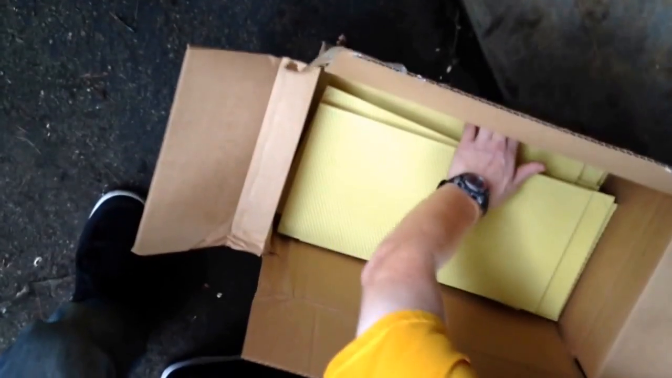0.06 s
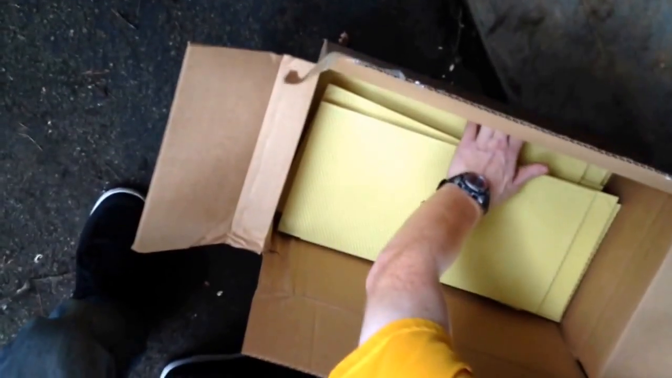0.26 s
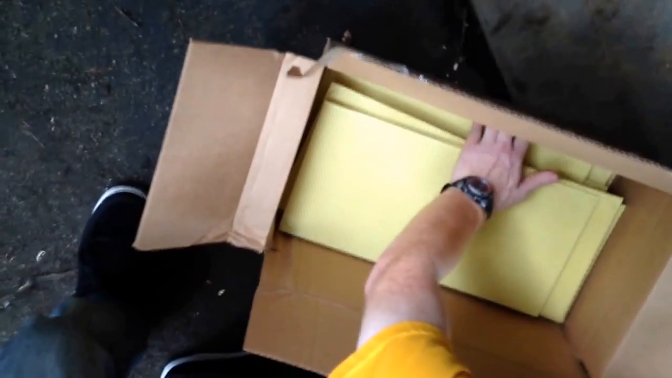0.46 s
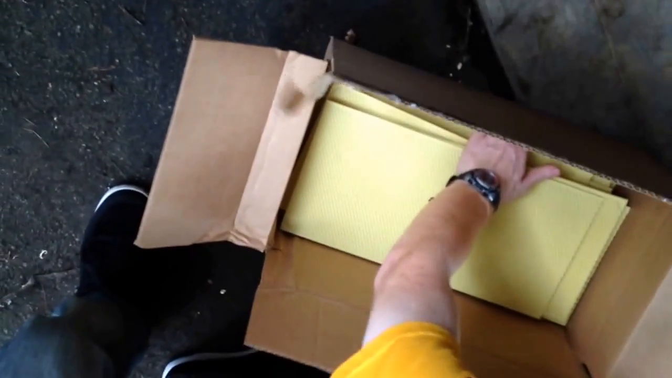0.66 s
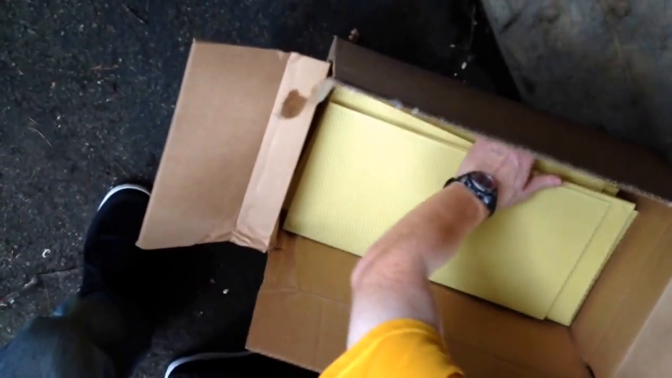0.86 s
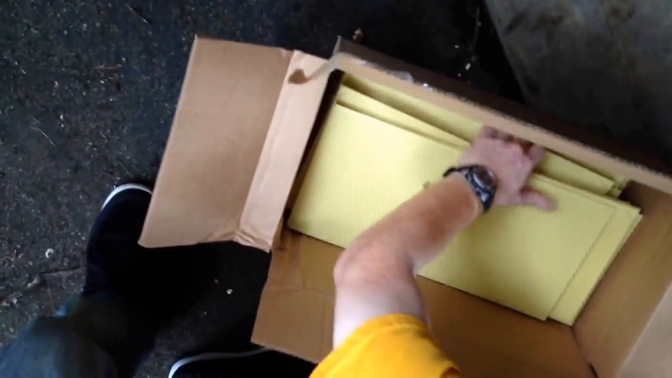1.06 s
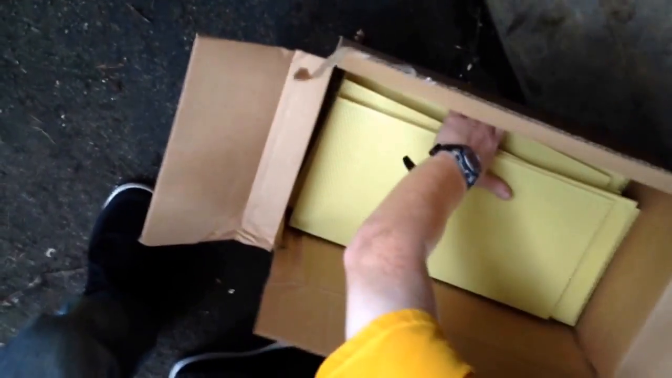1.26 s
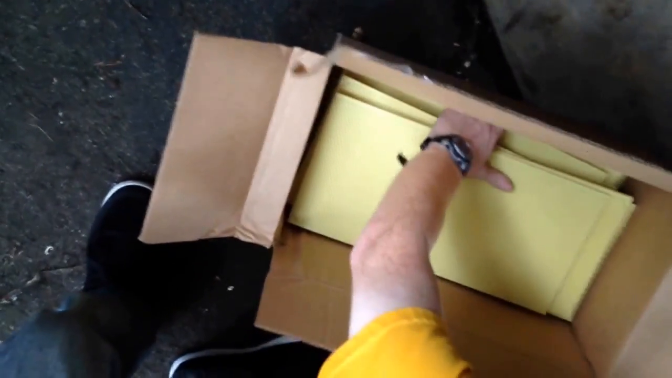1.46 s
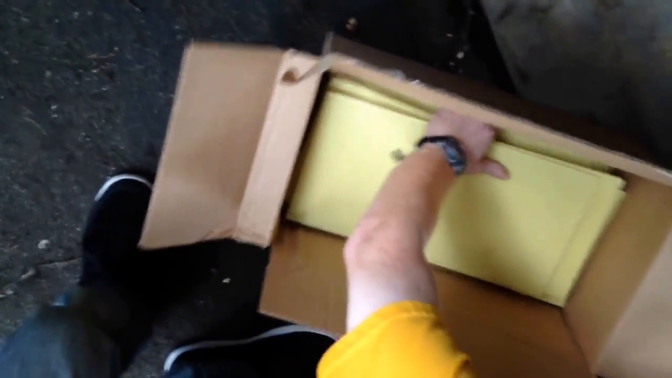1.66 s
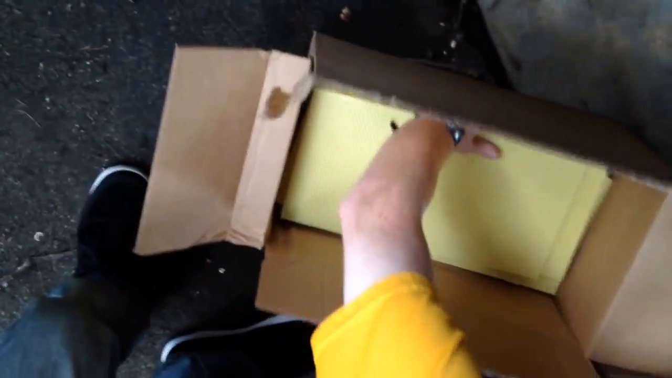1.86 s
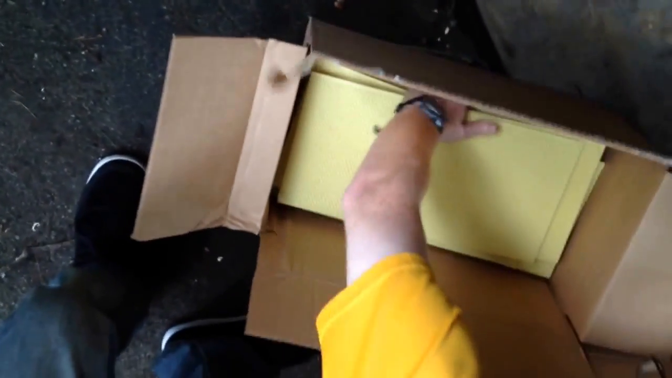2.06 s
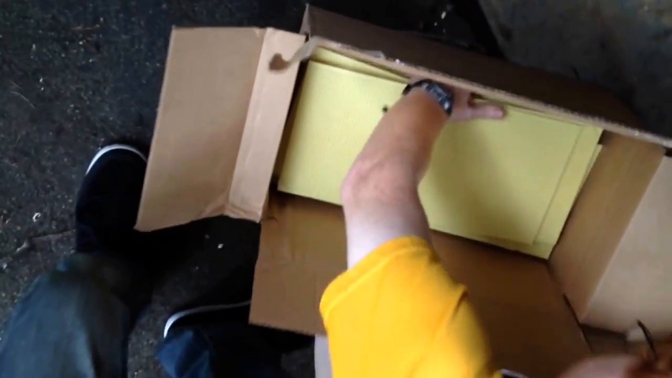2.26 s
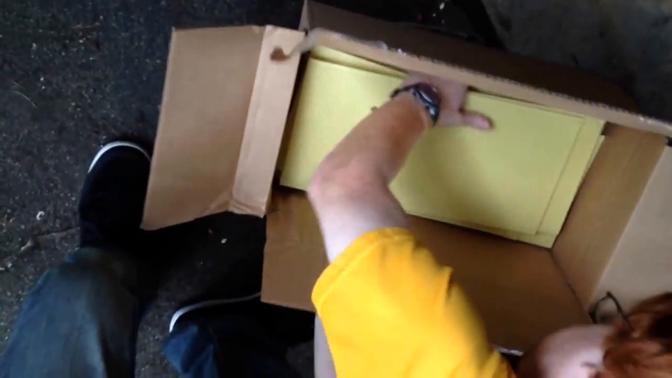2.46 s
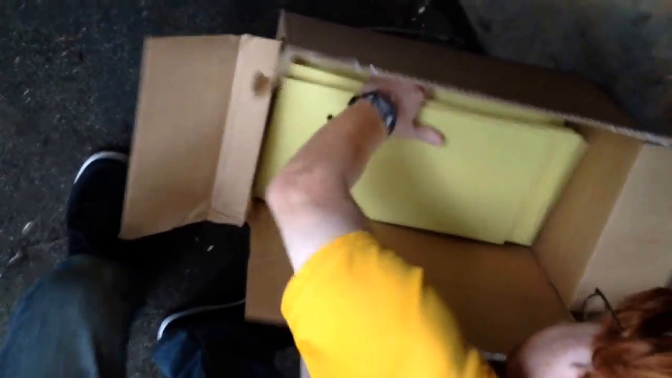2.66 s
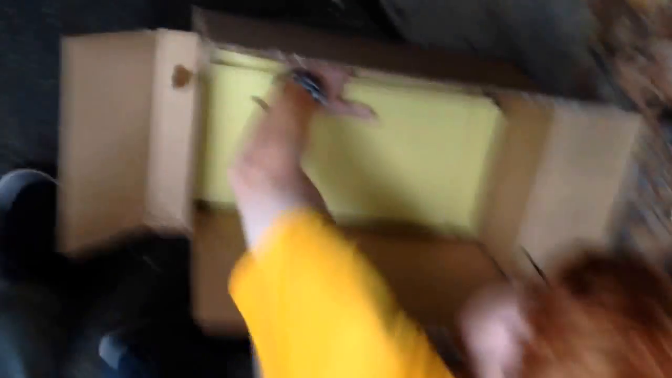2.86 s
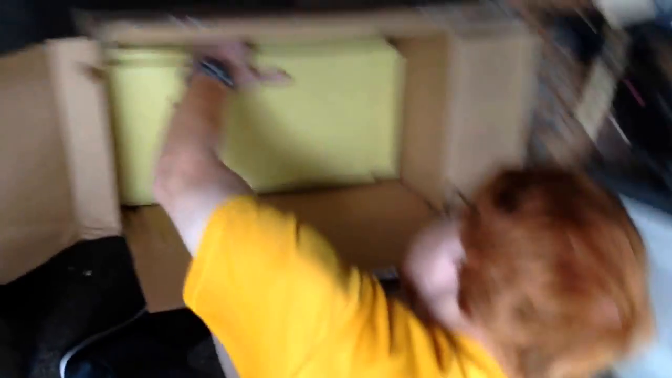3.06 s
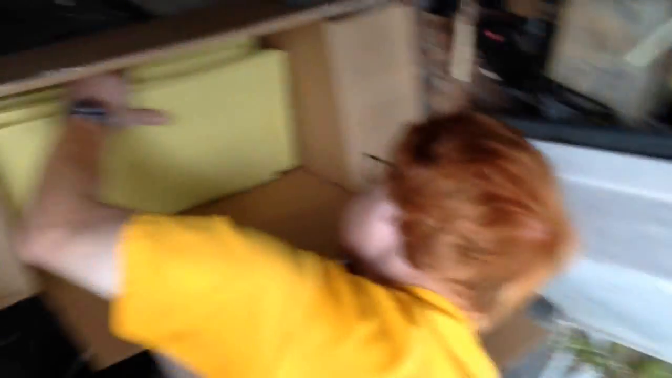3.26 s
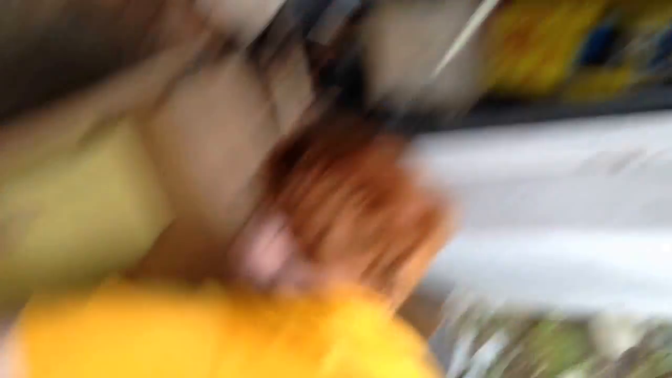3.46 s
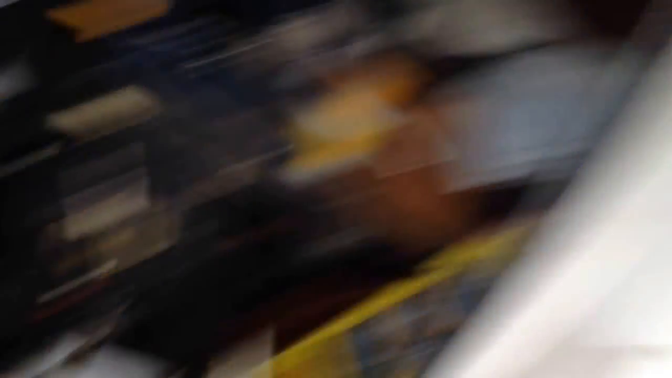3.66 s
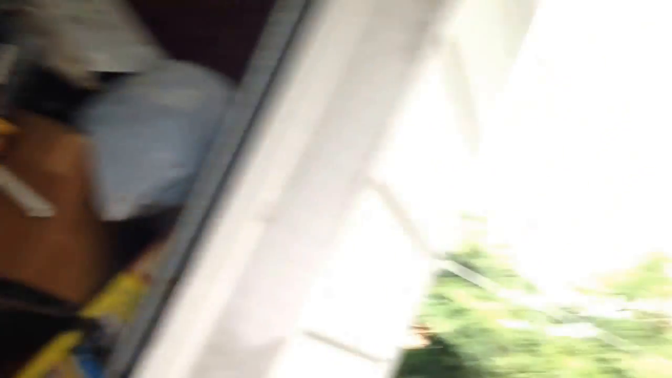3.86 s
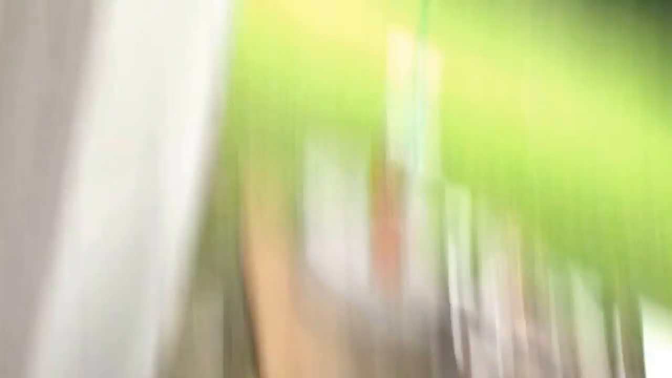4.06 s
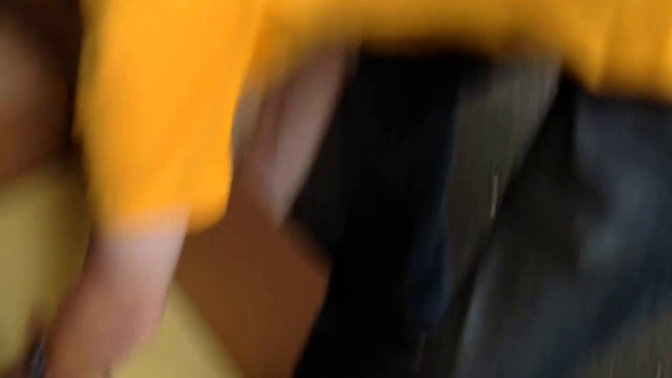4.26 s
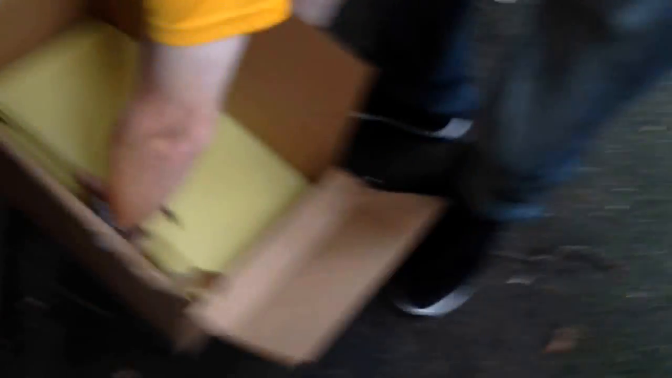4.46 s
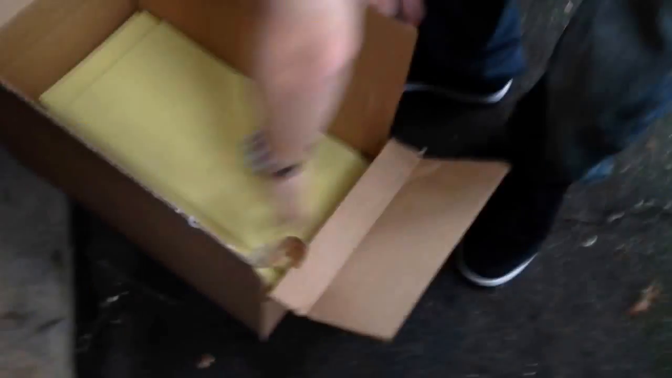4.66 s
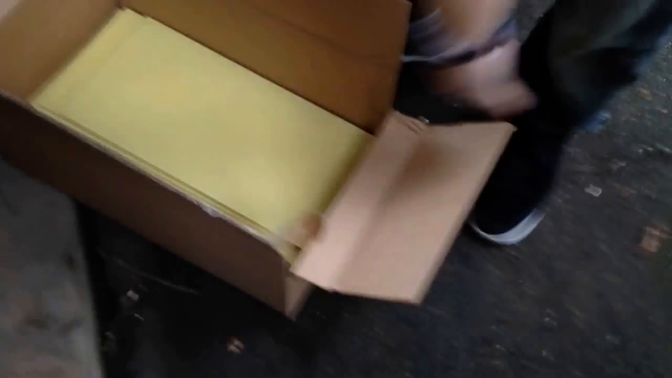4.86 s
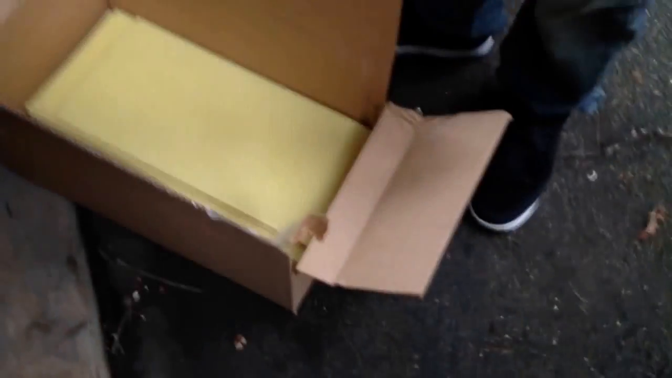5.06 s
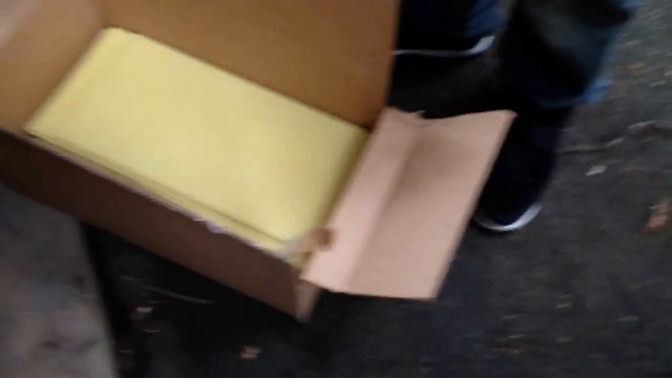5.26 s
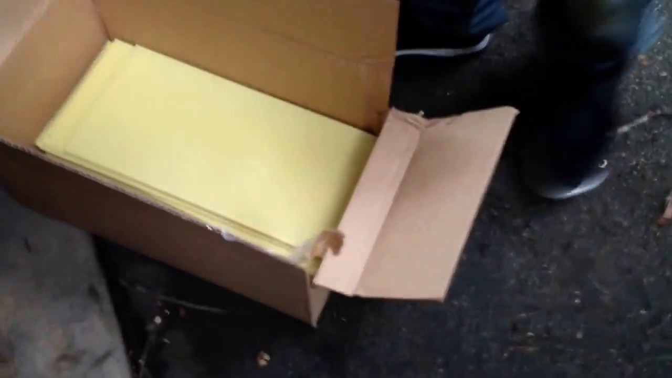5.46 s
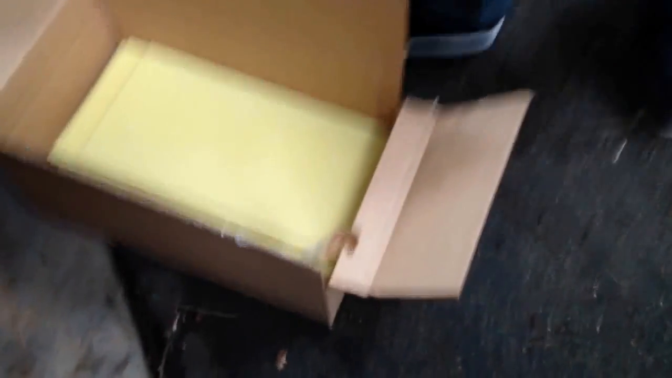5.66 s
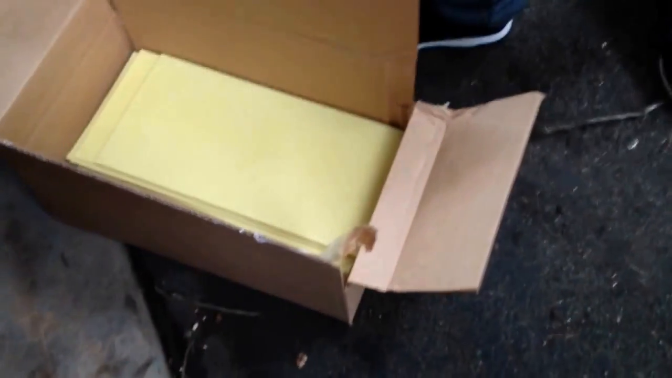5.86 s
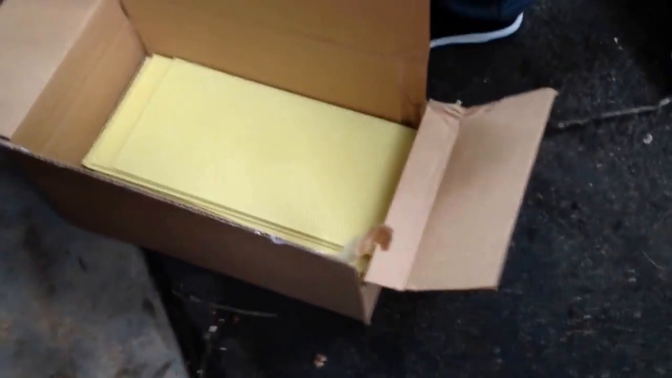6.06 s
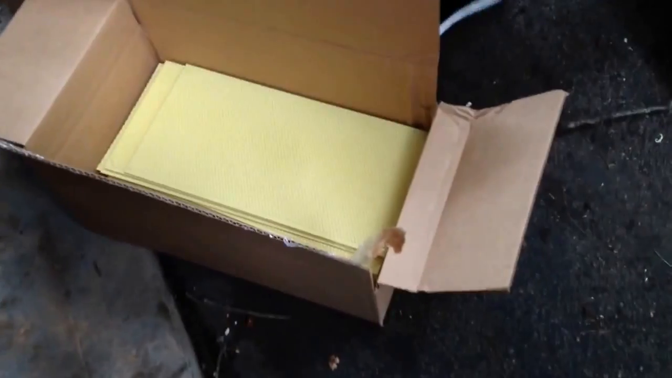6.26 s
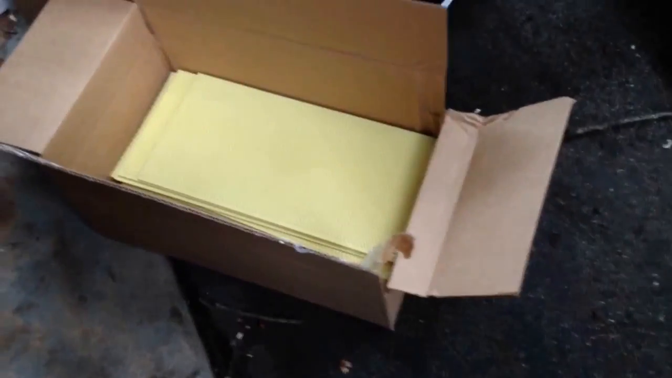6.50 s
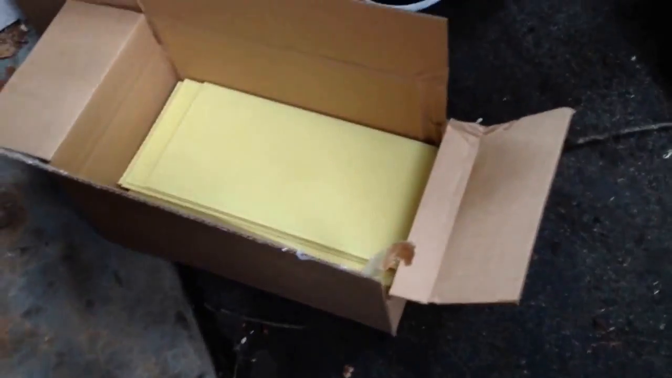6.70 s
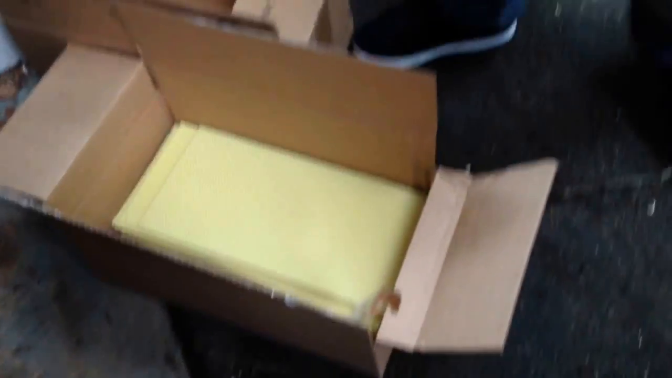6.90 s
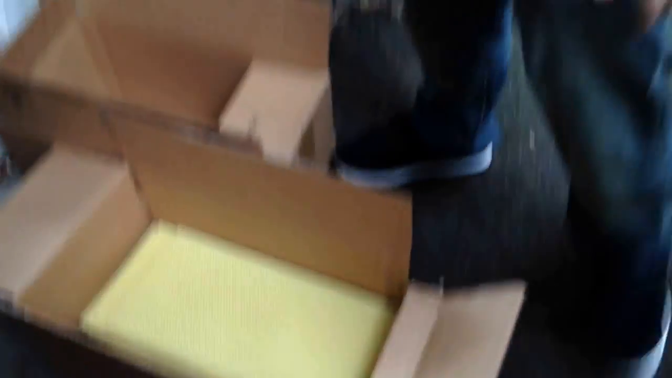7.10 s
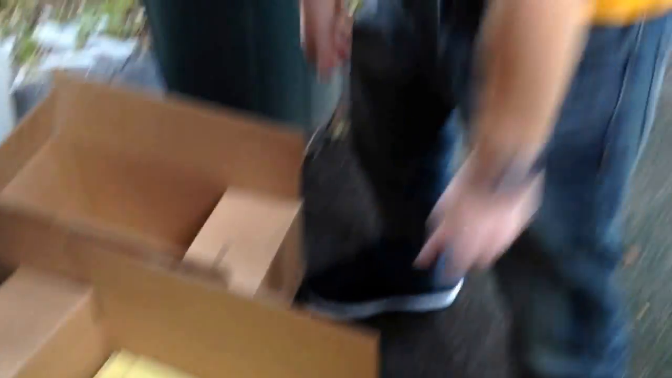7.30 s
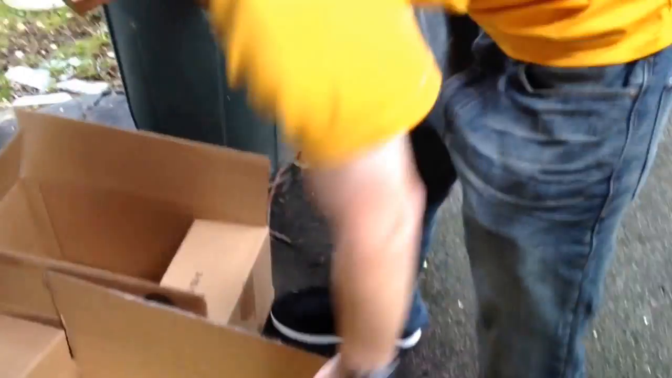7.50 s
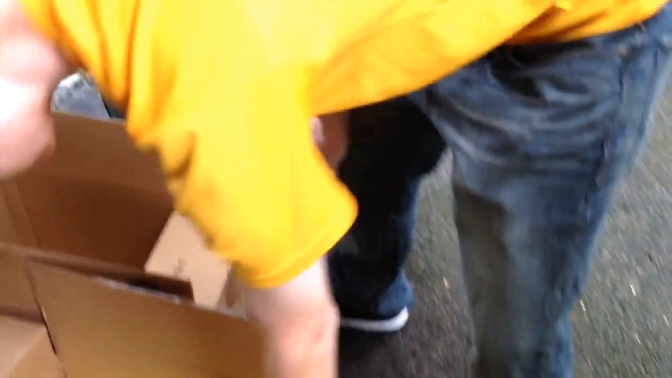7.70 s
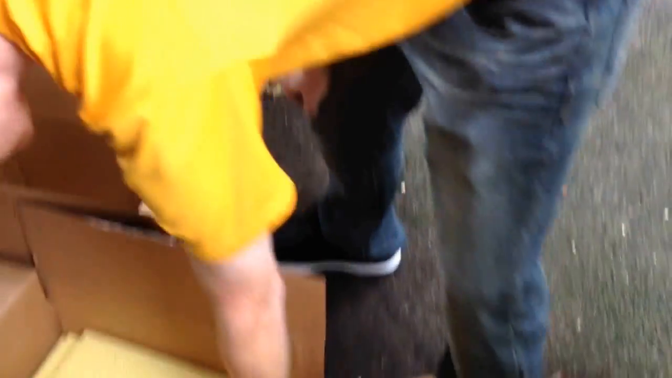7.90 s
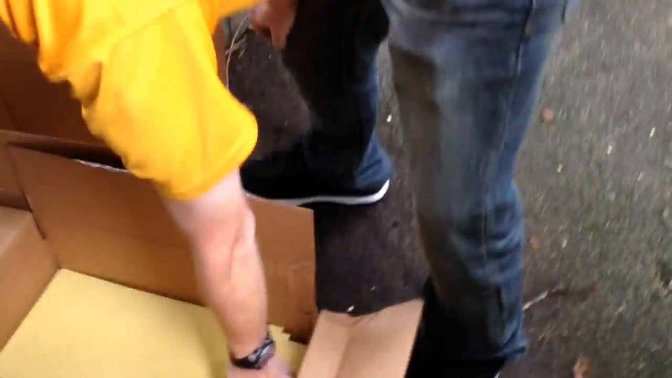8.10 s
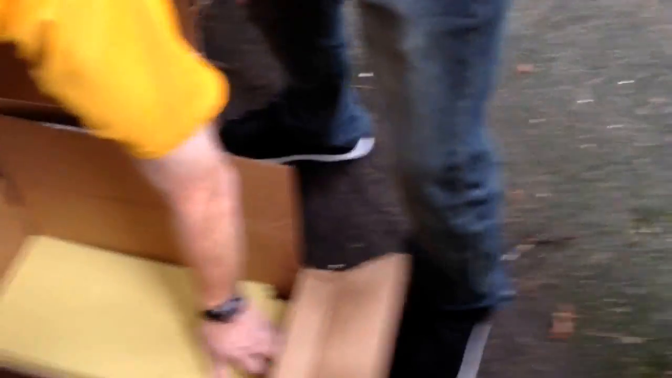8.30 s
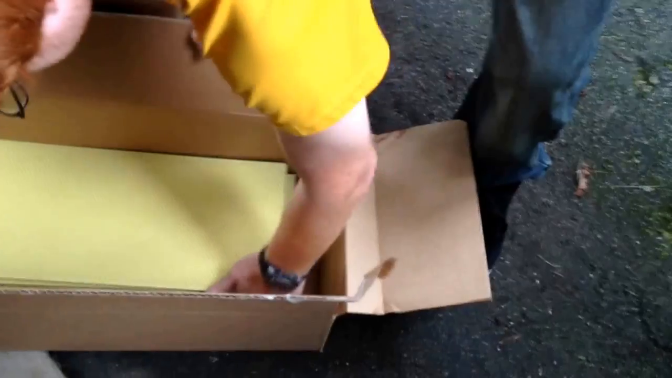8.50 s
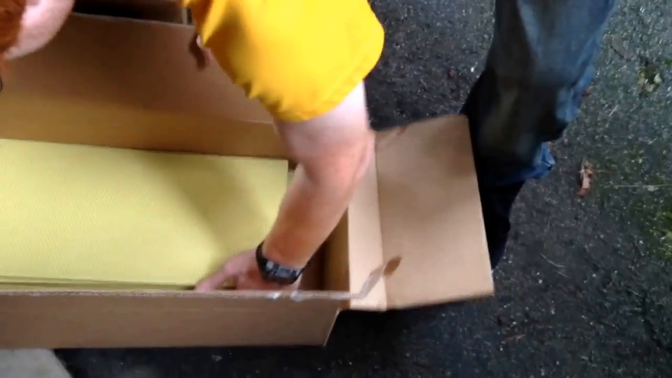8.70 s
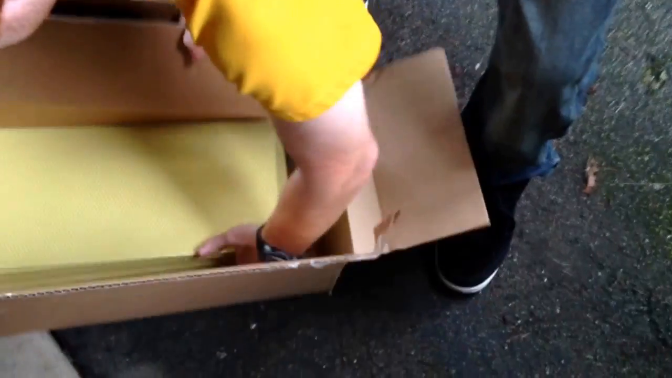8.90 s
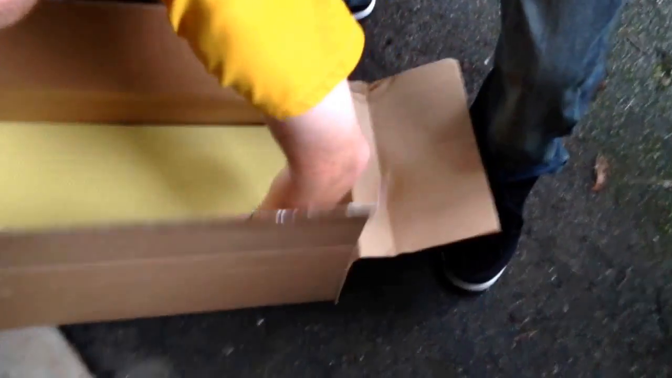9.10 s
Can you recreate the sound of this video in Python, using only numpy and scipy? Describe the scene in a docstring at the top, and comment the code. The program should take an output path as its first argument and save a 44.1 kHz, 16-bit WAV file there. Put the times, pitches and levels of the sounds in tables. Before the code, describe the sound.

A person's hands rub and push a cardboard box holding stiff plastic sheets. Faint rustles grow into scrapes, hollow thuds, knocks and cracking snaps, loudest around three to four seconds, with one short flap creak. A near-silent pause leaves low hum, far traffic, insects and faint birds before bumping and sliding resume. The microphone is close and the sound mostly dry, beside an open shed door.

```python
"""Box and plastic sheets

Hands shove a cardboard box and slide stiff plastic sheets inside it, by an open door.
Strokes are grainy friction noise; thuds, knocks, snaps and clicks are short dying sounds; a flap creaks once.
Behind them are a mains hum, far traffic and insects in one soft rush, and a few faint bird notes."""
import sys
import numpy as np
from scipy import signal
from scipy.fft import rfft, irfft, next_fast_len
from scipy.io import wavfile
from scipy.ndimage import uniform_filter1d, map_coordinates

SR = 44100
rng = np.random.default_rng(int(sys.argv[2]) if len(sys.argv) > 2 else 0)


def dump(signal):
    """Clip the signal to [-1, 1] and save it as 16-bit WAV at the path in sys.argv[1]."""
    limited = np.clip(np.atleast_2d(signal).T, -1, 1)
    pcm = np.round(limited * 32767).astype(np.int16)
    wavfile.write(sys.argv[1], SR, pcm)


N = 403074  # length in samples

# All levels in dB are settings that the functions below may trim.
# Strokes of hands, card and sheets. Each row: start of full strength in seconds, seconds to rise 20 dB,
# seconds held, seconds to fall 20 dB, rasp of card in dB, then scratch of nails, hiss of sheets
# and boom of the walls, each in dB over the rasp.
# Negative times cut off part of a stroke, or all of it.
STROKES = [(0.025, .02, .01, 0.07, -56, -14.5, -13, 15.5), (0.312, 0.17, 0.017, 0.1, -60.5, -6, -1, 6),
           (0.447, 0.23, .01, 0.14, -57.5, -11.5, -16, 7.5), (0.706, 0.06, 0.048, 0.14, -66, 3, 12.5, 8),
           (0.803, 0.0045, .045, 0.03, -30, -6.5, -11, -5), (0.927, .005, 0.009, 0.02, -42.5, -6, -3, -4),
           (1.014, .004, .008, .03, -39, -6, -10, -2), (1.072, .005, .016, .035, -39, -5.5, -7, -6),
           (1.148, -0.01, 0.028, 0.12, -52, -4, -1.5, 11.5), (1.201, -0.01, 0.019, 0.1, -45, -1.5, -0.5, 8),
           (1.633, 0.03, 0.019, 0.05, -31.5, -8.5, -11, 6), (1.675, .05, 0.055, 0.18, -45.5, -1, 4.5, -5),
           (1.913, .02, .03, .12, -42, -3, -3, 5), (2.03, .01, .03, .06, -47, -6, -6, 6),
           (2.21, .04, .06, .04, -42, -16, -12, 4), (2.38, .004, .016, .025, -36, -10, -16, 6.5),
           (2.469, 0.0039, 0.022, 0.08, -33, -4, -7, -1), (2.527, 0.0451, 0.057, .1, -35, -8, -10, 6),
           (2.64, 0.02, .04, .04, -37, -5, -8, 4), (2.682, .01, .018, .04, -30, -2.5, -7.5, -2),
           (2.879, .005, 0.016, .07, -43, 0.5, -1.5, 10.5), (3.048, -0.02, .05, 0.1, -38.5, -11.5, -14, 5),
           (3.209, .012, .014, .022, -25, -1, -11, -3), (3.27, 0.08, 0.07, 0.01, -41, -3, -0.5, 5),
           (3.32, 0.0157, .022, .045, -29, 1, -4, 2), (3.395, 0.1, .03, 0.09, -42, -4, -2.5, 10.5),
           (3.502, 0.025, 0.029, .035, -31, 1, -3, -4.5), (3.878, 0.04, 0.11, 0.07, -38, -3.5, -4, 2.5),
           (3.995, 0, 0.032, 0.0389, -22.5, -3, -4.5, -0.5), (4.333, 0.1, 0.043, .2, -49, -5, 1.5, 3.5),
           (4.411, -0.07, .02, 0.15, -43, -4, -1, 1), (4.455, .02, .06, .06, -41, -6.5, -1, 10),
           (4.56, .03, .055, .04, -48, -2, 1, 3), (4.683, 0, 0.036, 0.0454, -44.5, -12.5, 0.5, 8.5),
           (4.802, -0.14, 0.017, 0.0735, -51, -11, -11, -2), (5.65, .03, 0.044, .06, -59, -6, -7, 7.5),
           (5.78, .03, .03, .08, -62, 0, -2, 0), (6.0, .03, .045, .04, -57, -9, -11, -8),
           (6.663, .012, 0.054, 0.0651, -43.5, -4.5, 3.5, 5.5), (7.295, 0.5, .01, -0.24, -55, -6, -6, 2),
           (7.381, 0.04, 0.078, 0.076, -42.5, -3.5, 3.5, 4), (7.682, -0.01, .01, 0.05, -47, -17, -14, 18),
           (7.695, 0, 0.11, .1, -55, -4, 3, 5), (7.986, .025, 0.066, 0.0655, -34, -9, -5.5, -1.5),
           (8.084, 0.0155, 0.013, 0.08, -38.5, -9.5, -12.5, 6),
           (8.175, .06, 0, .035, -34.5, -12.5, -14.5, 4), (8.598, 0.03, 0.019, 0, -48.5, -12.5, -9.5, 4.5),
           (8.71, -0.05, .03, 0.1, -45, -4, 2, 2), (8.787, 0.1174, .11, .2, -40, -1.5, 7.5, 6.5),
           (8.978, 0.12, 0.057, 0.05, -46, -1, 6, -8)]
# Light rustle while the hands rest on the load. Each row: time in seconds, rasp in dB, hiss in dB over the rasp.
RESTING_RUSTLE = [(0, -68.5, -1), (.65, -68.5, 2.5), (.89, -52, -2), (1.1, -60, -3.5), (1.85, -66, 4.5),
                  (2.74, -49, 0), (3.0, -62.5, 4.5), (3.5, -54, 2.5), (3.83, -56.5, -0.5), (4.08, -44, 1),
                  (4.24, -60.5, 4.5), (4.75, -65, 1), (4.95, -83.5, 8), (5.5, -84.5, 13.5), (5.87, -70, 2),
                  (6.0, -77, 3), (6.6, -80, 1), (6.85, -67, -4), (7.6, -68, 6), (7.95, -67, -6),
                  (8.31, -57.5, -3.5), (8.58, -71.5, 4.5), (9.14, -74, 6)]
REST_SCRATCH_DB, REST_BOOM_DB = -3.5, 6.5  # both over the resting rasp
# Tone colour of the four kinds of rubbing. Each row: frequency in Hz, relative strength in dB per Hz.
RASP_SPECTRUM = [(320, -26.5), (550, -1), (797, 3.5), (977, 0), (1050, -1), (1440, -0.5), (2200, -10),
                 (2860, -33), (4840, -120)]
SCRATCH_SPECTRUM = [(1120, -33), (1900, -3), (2280, -4), (3460, -6.5), (4500, -11), (5850, -36.5),
                    (9900, -120)]
HISS_SPECTRUM = [(2240, -33.5), (3800, -5.5), (5700, -2.5), (8260, -2.5), (13100, -5.5), (15500, -11.5)]
BOOM_SPECTRUM = [(24, -37.5), (40, -11.5), (91, -3), (166, -3.5), (204, 1), (238, -2.5), (321, 2),
                 (700, -12), (910, -37.5), (1540, -120)]

# Thuds on the box. Each row: time in seconds, level in dB, pitch of the struck wall in Hz,
# heave of the whole box in dB relative to the thud.
THUDS = [(0.022, -33, 296, -33), (0.443, -34.5, 610, -26), (0.8, -24.5, 301, -29), (0.974, -35.5, 360, -27),
         (1.008, -36, 495, -24), (1.071, -36, 657, -26), (1.151, -29.5, 290, -23), (1.197, -21.5, 296, -19),
         (1.335, -41, 250, -13), (1.628, -17, 118, -32), (1.777, -35, 137, -12), (1.916, -27, 588, -27.5),
         (2.029, -31, 310, -17), (2.16, -32.5, 431, -28), (2.224, -24.5, 192, -14),
         (2.334, -33.5, 280, -16), (2.377, -24, 416, -31), (2.479, -22, 333, -26), (2.537, -17.5, 283, -15),
         (2.76, -26.5, 273, -19), (2.808, -26.5, 338, -28), (2.875, -25.5, 335, -33),
         (2.927, -28.5, 182, -11), (3.054, -27, 340, -35), (3.207, -9, 326, -38), (3.323, -11, 340, -29),
         (3.385, -17.5, 288, -21), (3.503, -17.5, 607, -22), (3.604, -20.5, 184, -18.5),
         (3.881, -28, 316, -13), (3.992, -16.5, 417, -30), (4.408, -27, 319, -15), (4.451, -20, 326, -9),
         (4.701, -21.5, 342, -39), (6.651, -25.5, 215, -12.5), (6.923, -47, 352, -5.5),
         (7.293, -36.5, 229, -18), (7.373, -32, 212, -14), (7.442, -27, 337, -15),
         (7.678, -21.5, 251, -15.5), (7.732, -27.5, 350, -27), (8.016, -13, 211, -22),
         (8.087, -18, 219, -10), (8.221, -18.5, 218, -12), (8.602, -35.5, 205, -9), (8.716, -29, 211, -19),
         (8.814, -22.5, 219, -17), (8.854, -16.5, 203, -17)]
# Resonances of the box. Each row: frequency in Hz, width in Hz, level in dB.
BOX_MODES = [(338, 66, 1.5), (590, 49, 0.5), (746, 31, -2), (1090, 170, -11), (1410, 13, -10.5)]
CONTACT_S, WALL_T60_S = 0.0077, 0.063  # time to swell, then time to fall 60 dB

# Knuckle and edge knocks on card. Each row: time in seconds, level in dB, pitch in Hz.
KNOCKS = [(0.145, -42, 950), (0.446, -27, 600), (0.49, -38, 1200), (0.657, -36, 4000), (0.724, -36, 4200),
          (0.739, -33.5, 3650), (0.805, -11.5, 670), (1.015, -26.5, 970), (1.074, -28, 655),
          (1.2, -21, 1000), (1.634, -17, 620), (1.916, -26.5, 604), (1.965, -28.5, 1010), (2.028, -30, 850),
          (2.161, -27.5, 905), (2.379, -21.5, 756), (2.476, -20, 880), (2.681, -15.5, 665),
          (2.764, -29, 1440), (3.209, -17, 775), (3.32, -12.5, 590), (3.512, -13, 764), (3.875, -33.5, 745),
          (3.992, -9.5, 730), (4.335, -28.5, 1060), (4.411, -27, 1170), (4.454, -22.5, 800),
          (4.506, -20.5, 1220), (4.707, -22, 620), (4.802, -36, 950), (7.679, -26, 606), (7.736, -30, 980),
          (7.788, -32.5, 620), (8.72, -25, 1010)]
CARD_T60_S = 0.045  # time to fall 60 dB

# Snaps of sheet edges. Each row: time in seconds, level in dB, brightness in dB per octave.
SNAPS = [(0.1526, -39.5, 1), (0.175, -39, 3), (0.2553, -43, -3.5), (0.4454, -36.5, -7), (0.548, -41, 2),
         (0.5831, -42, 1.5), (0.637, -45, 6), (0.675, -36, 5), (0.8075, -23, -5.5), (0.9063, -32, 7),
         (0.9276, -23, -1), (1.0156, -32, -3), (1.037, -28, 3), (1.0748, -31, -6.5), (1.1974, -26, -3),
         (1.5793, -35, 2), (1.6536, -20, 1), (1.753, -23, 2), (1.8392, -44, 4), (1.916, -22.5, -4.5),
         (2.161, -28, -4.5), (2.4264, -29.5, -2.5), (2.4603, -23.5, 3), (2.6444, -30.5, -1.5),
         (2.693, -24.5, -4.5), (2.8115, -26, -4), (2.8756, -31, -1), (2.8876, -21, 0.5), (3.1375, -32.5, 5),
         (3.1621, -20, 2), (3.214, -22, -7), (3.3182, -15.5, -6), (3.3349, -12, -4.5), (3.4054, -24, -.5),
         (3.457, -20, -8), (3.5123, -13.5, -6), (3.591, -35, -4), (3.8756, -32, -2), (4.0188, -7.5, -2),
         (4.41, -26.5, -1), (4.4535, -21.5, 3), (4.5555, -28, 0), (4.574, -22.5, -1), (4.6756, -28.5, 2),
         (4.7057, -25, -2.5), (6.1332, -48, -2.5), (6.654, -42, 3), (6.6822, -26, -4), (7.352, -33.5, 0.5),
         (7.3867, -31, 2.5), (7.9832, -21.5, -2.5), (8.169, -27, -10), (8.6418, -43, 12),
         (8.6667, -35, 3.5), (8.7036, -27.5, 0), (8.8485, -18.5, 2)]
SPRAY_T60_S = 0.034  # time to fall 60 dB

# Bare clicks of a sheet corner. Each row: time in seconds, level in dB, pitch in Hz.
CLICKS = [(2.694, -14, 3000), (3.3349, -7, 3000), (3.5123, -8, 2500), (3.9928, -5, 1800),
          (4.0068, -7, 4000), (6.7185, -23.5, 6000), (8.933, -12, 9000), (8.994, -17, 5700),
          (9.0231, -15, 4500)]
CLICK_CYCLES = 0.9  # cycles to fade to about a third

# The creak of a flap. Each row: time in seconds, slips a second, level in dB.
CREAK = [(4.085, 235, -24), (4.093, 197, -18.5), (4.102, 187, -18), (4.115, 176, -14), (4.127, 100, -22.5),
         (4.146, 73, -30)]
# Resonances of the flap, two low and then three high. Each row: frequency in Hz, width in Hz, level in dB.
FLAP_MODES = [(183, 300, 0), (534, 290, -7.5), (2080, 650, -15.5), (3740, 410, -13), (4700, 606, -19)]

# Hollow rubs that sing in one panel, and at 7.519 s one faint, breathy bird note.
# Each row: start in seconds, length in seconds, frequency in Hz, width in Hz, level in dB.
BREATHY_TONES = [(0.805, .06, 700, 300, -32), (3.045, 0.07, 1050, 550, -38), (3.05, .065, 345, 110, -33),
                 (3.053, 0.065, 2560, 1100, -48), (3.607, .045, 230, 150, -35),
                 (4.693, .035, 345, 120, -35), (4.413, 0.048, 4070, 900, -41),
                 (4.574, 0.05, 1330, 800, -43.5), (6.004, 0.049, 1005, 150, -45),
                 (6.026, 0.019, 1270, 200, -56), (7.519, 0.26, 4500, 800, -59.5),
                 (7.982, 0.074, 1600, 446, -31.5), (8.16, 0.08, 1400, 900, -37)]

# Whistled bird notes. Each row: start in seconds, length in seconds, first pitch in Hz,
# last pitch in Hz, level in dB.
BIRD_NOTES = [(1.478, 0.16, 6860, 7040, -59), (2.023, 0.052, 6880, 6870, -53),
              (3.757, 0.062, 4390, 4330, -57.5), (5.18, 0.11, 6800, 6770, -74),
              (5.317, 0.096, 8270, 8060, -67.5), (5.487, 0.13, 8360, 8450, -66),
              (5.69, 0.18, 8700, 8600, -73), (6.134, 0.096, 1776, 1770, -76), (6.302, .05, 3220, 2980, -72),
              (6.358, 0.095, 2790, 2660, -73), (6.431, 0.034, 2400, 2360, -67),
              (6.463, 0.062, 2670, 2580, -70), (0.188, .035, 3330, 3330, -72),
              (0.599, 0.027, 3330, 3330, -72), (6.837, 0.41, 2185, 2336, -74),
              (1.34, 0.036, 2280, 2300, -61), (7.555, 0.099, 8400, 8900, -67)]

# Tone colour of far traffic and insects. Each row: frequency in Hz, relative strength in dB per Hz.
AIR_SPECTRUM = [(20, -25.5), (40, -8), (64, 1.5), (90, -6.5), (200, -12.5), (450, -17), (800, -28),
                (2300, -31), (2800, -36.5), (5000, -36.5), (5600, -27), (6800, -31), (7200, -42.5),
                (15500, -45)]
# Parts of the mains hum. Each row: frequency in Hz, level in dB.
HUM_TONES = [(59.2, -60.5), (119, -74), (360.7, -72.5)]

# How the room's answer dies. Each row: frequency in Hz, time to fall 60 dB in seconds.
ROOM_T60 = [(150, 0.17), (1500, 0.12), (10000, 0.13)]

DIP_S, DIP_LENGTH_S, DIP_DB = 8.383, 0.015, -23
TOP_HZ = 15300


def rubbing():
    """Skin, card and plastic drag in jerks that all layers share."""
    rest_db, rest_hiss_db = curves(RESTING_RUSTLE)
    jerk = wobble(50)
    rasp_gain = strokes(axis=0, rest_db=rest_db, lingers=0.98) * amp(-1.5 + 2.1 * jerk)
    scratch_gain = strokes(axis=1, rest_db=rest_db + REST_SCRATCH_DB, lingers=0.93) * amp(2.54 * jerk)
    hiss_gain = strokes(axis=2, rest_db=rest_db + rest_hiss_db, lingers=0.92) * amp(1.3 * jerk)
    boom_gain = strokes(axis=3, rest_db=rest_db + REST_BOOM_DB, lingers=0.98) * amp(-2.5 + 1.3 * jerk)
    rasp = friction(RASP_SPECTRUM, grains=500, spike_db=4, share=0.6, patchy_db=2.5)
    scratch = friction(SCRATCH_SPECTRUM, grains=700, spike_db=6, share=0.53, patchy_db=2.0)
    hiss = friction(HISS_SPECTRUM, grains=1100, spike_db=5.0, share=0.72, patchy_db=3.0)
    boom = friction(BOOM_SPECTRUM, grains=150, spike_db=3.0, share=0.61, patchy_db=3.0)
    return rasp_gain * rasp + scratch_gain * scratch + hiss_gain * hiss + boom_gain * boom


def strokes(axis, rest_db, lingers):
    """Gain of one layer: strokes climb, hold and fall at their own speeds in dB, added to the resting rustle."""
    t = np.arange(N) / SR
    power = amp(2 * rest_db)
    for s, rise, hold, fall, db, *over_db in STROKES:
        near = slice(max(round((s - 3 * rise) * SR), 0), round((s + hold + 3 * fall) * SR))
        before = (s - t[near]) / max(rise, 0.002)
        after = (t[near] - s - hold) / max(fall * lingers, 0.005)  # lingers scales the fall time
        away = np.maximum(before, after).clip(0)
        layer_db = db + [0, *over_db][axis]
        power[near] += amp(2 * (layer_db - 20 * away))
    return np.sqrt(power)


def friction(spectrum, grains, spike_db, share, patchy_db):
    """Tiny slips of uneven size (grains a second) on a smooth rush, in patches of random gain; rms 1."""
    size_db = spike_db * np.minimum(rng.exponential(size=N), 2.5)
    happens = rng.random(N) < grains / SR
    slips = happens * amp(size_db) * np.sign(rng.standard_normal(N))
    rush = rng.standard_normal(N)
    z = signal.stft(rush + share * unit(slips), nperseg=256)[2]
    # smooth the random patches over pitch, then over time
    patches = uniform_filter1d(rng.standard_normal(z.shape), 8, 0)
    patches = uniform_filter1d(patches, 6, 1)
    rough = signal.istft(z * amp(patchy_db * unit(patches)), nperseg=256)[1][:N]
    return unit(filtered(rough, lambda hz: amp(along(spectrum, hz))))


def thuds():
    """A soft, chattering contact drives the box modes, most those near the struck wall's pitch."""
    track, t = np.zeros(N), np.arange(SR // 6) / SR
    swell = np.minimum(t / CONTACT_S, 1) ** 0.89
    swell = swell * amp(-60 * np.maximum(t - CONTACT_S, 0) / WALL_T60_S)
    for s, db, hz, heave_db in THUDS:
        luck = rng.standard_normal((2, len(t)))
        drift = 0.17 * np.cumsum(luck[0]) * np.sqrt(hz / SR)
        wall = np.sin(2 * np.pi * hz * t + drift)
        # a mode loses 5 dB for each octave away from the wall's pitch
        near = [(c, w, level - 5 * abs(np.log2(c / hz))) for c, w, level in BOX_MODES]
        others = unit(filtered(luck[1], resonances(near)))
        heave = amp(heave_db + 7.0 - 60 * t / 0.15) * np.sin(2 * np.pi * 105 * t)
        add(track, s - 0.002, amp(db - 4) * (swell * (wall + 0.49 * others) + heave))
    return track


def knocks():
    """A hard, quick contact: a clean first swing, then the card rings untidily around one pitch."""
    track, t = np.zeros(N), np.arange(SR // 8) / SR
    for s, db, hz in KNOCKS:
        panel = resonances([(hz, 0.18 * hz, 0), (1.91 * hz, 0.41 * hz, -9)])
        ring = unit(filtered(rng.standard_normal(len(t)), panel))
        ring = ring * amp(-60 * t / CARD_T60_S) * (1 - np.exp(-t / 0.00073))
        swing = 0.57 * np.sin(2 * np.pi * 1.3 * hz * t) * np.exp(-0.7 * hz * t)
        add(track, s - 0.001, amp(db - 7) * (ring + swing))
    return track


def snaps():
    """A sheet edge lets go: one sharp click, then a spray of crackle that dies fast."""
    track, t = np.zeros(N), np.arange(SR // 8) / SR
    # the short second part makes the click
    fade = amp(-60 * t / SPRAY_T60_S) + 1.66 * amp(-60 * t / 0.004)
    attack = 1 - np.exp(-t / 0.0003)
    for s, db, tilt_db in SNAPS:
        luck = rng.standard_normal((2, len(t)))
        crackle = luck[0] * amp(1.7 * luck[1])

        def slope(f):
            tilt = amp(tilt_db * np.log2((f + 300) / 3000))
            return tilt * (1j * f / (600 + 1j * f)) ** 2  # weak bass

        spray = unit(filtered(crackle, slope))
        add(track, s, amp(db - 8.5) * spray * fade * attack)
    return track


def clicks():
    """A sheet corner makes one dry swing, mostly over in about a cycle."""
    track, t = np.zeros(N), np.arange(SR // 200) / SR
    for s, db, hz in CLICKS:
        add(track, s, amp(db) * np.cos(2 * np.pi * hz * t) * np.exp(-t * hz / CLICK_CYCLES))
    return track


def creak():
    """Stick and slip: one push for each slip, slowing down; the harder slips are also the sharper."""
    rate, db = curves(CREAK)
    t = np.arange(N) / SR
    on = (t > CREAK[0][0]) & (t < CREAK[-1][0])
    # a slip falls wherever the running count passes a whole number
    slips = np.diff(np.floor(np.cumsum(rate * on) / SR), prepend=0)

    def steep(modes):
        return lambda f: sum(amp(level) * resonances([(c, w, 0)])(f) ** 2 for c, w, level in modes)

    push = filtered(slips * amp(db + 37.5), steep(FLAP_MODES[:2]))
    # each slip tears for a moment instead of letting go at once
    tear_shape = filtered(slips, lambda f: 1 / (1 + 2j * np.pi * f * 0.0024))
    tear = tear_shape * rng.standard_normal(N)
    return push + filtered(tear * amp(1.41 * db + 66.5), steep(FLAP_MODES[2:]))


def breathy_tones():
    """Noise that starts quickly, held in one steep resonance: hollow rubs and one breathy bird note."""
    track = np.zeros(N)
    for s, length, hz, width_hz, db in BREATHY_TONES:
        u = np.linspace(0, 1, int(length * SR))
        resonance = resonances([(hz, width_hz, 0)])
        tone = unit(filtered(rng.standard_normal(len(u)), lambda f: resonance(f) ** 2))
        add(track, s, amp(db) * np.sin(np.pi * u).clip(0) ** 0.39 * tone)
    return track


def birds():
    """Thin, far whistles glide in pitch; random drift makes them husky and their loudness wavers."""
    track = np.zeros(N)
    for s, length, first_hz, last_hz, db in BIRD_NOTES:
        u = np.linspace(0, 1, int(length * SR))
        drift = 0.09 * np.cumsum(rng.standard_normal(len(u)))
        glide_hz = first_hz + (last_hz - first_hz) * u
        phase = 2 * np.pi * np.cumsum(glide_hz) / SR + drift
        add(track, s, amp(db + 2) * np.sin(np.pi * u) * np.sin(phase))
    return track * amp(4.5 * wobble(30))


def background():
    """Far traffic and insects as one slowly breathing rush, over a wavering hum."""
    t = np.arange(N) / SR
    hum = np.zeros(N)
    for hz, db in HUM_TONES:
        level = amp(db + 1.5 + 1.4 * wobble(3.6))
        hum += level * np.sin(2 * np.pi * hz * t + 0.6 * wobble(4.2))
    air = friction(AIR_SPECTRUM, grains=250, spike_db=3, share=0.11, patchy_db=0.5)
    return amp(-57 + 0.68 * wobble(3.3)) * air + hum


def room(x):
    """The shed's answer is a burst of noise in which each frequency dies at its own speed."""
    hz, t, z = signal.stft(rng.standard_normal(SR // 3), SR, nperseg=256)
    t60 = along(ROOM_T60, hz)[:, None]
    tail = signal.istft(z * amp(-60 * t / t60), SR, nperseg=256)[1]
    late = np.pad(x, (300, 0))  # the answer comes 300 samples late
    return signal.fftconvolve(late, tail / np.linalg.norm(tail))[:N]


def amp(db):
    """Turn dB into a plain gain."""
    return 10 ** (np.asarray(db) / 20)


def unit(x):
    """Scale a sound to rms 1."""
    return x / np.sqrt(np.mean(x ** 2) + 1e-20)


def along(points, hz):
    """Read a curve of (Hz, value) points on a log frequency axis."""
    f, v = np.transpose(points)
    return np.interp(np.log(hz + 1), np.log(f + 1), v)


def curves(rows):
    """One value per sample for each column after the time."""
    s, *cols = np.transpose(rows)
    return [np.interp(np.arange(N) / SR, s, c) for c in cols]


def wobble(rate):
    """A smooth random curve through rate random points a second."""
    points = rng.standard_normal(int(N * rate / SR) + 4)
    return map_coordinates(points, [np.arange(N) * rate / SR])


def filtered(x, response):
    """Shape a sound by a complex response of frequency."""
    m = next_fast_len(len(x) + 2048)
    return irfft(rfft(x, m) * response(np.fft.rfftfreq(m, 1 / SR)), m)[:len(x)]


def resonances(modes):
    """The causal response of (Hz, width, dB) resonances, with alternating signs."""
    def response(f):
        total = 0
        for k, (c, w, db) in enumerate(modes):
            total = total + (-1) ** k * amp(db) * 1j * f * w / (c * c - f * f + 1j * f * w)
        return total
    return response


def add(track, s, sound):
    """Mix a sound into the track at s seconds."""
    part = track[max(round(s * SR), 0):][:len(sound)]
    part += sound[:len(part)]


def scene():
    """Mix the short sounds and birds, their room answers, the rubbing and the background."""
    hits = thuds() + knocks() + snaps() + clicks() + creak() + breathy_tones()
    far = birds()
    answer = amp(-15.0) * room(hits) + amp(0.5) * room(far)
    return (hits + rubbing() + far + answer + background())[None]


def record(dry):
    """The microphone drops the deepest bass; the level dips once briefly; nothing is kept above TOP_HZ."""
    u = (np.arange(N) / SR - DIP_S) / DIP_LENGTH_S
    dip = amp(DIP_DB * np.clip(6 * np.minimum(u, 1 - u), 0, 1))

    def band(hz):
        return (1j * hz / (28 + 1j * hz)) ** 2 * (hz < TOP_HZ)

    return filtered(dry[0] * dip, band)[None]


dry = scene()
out = record(dry)
dump(out)
```